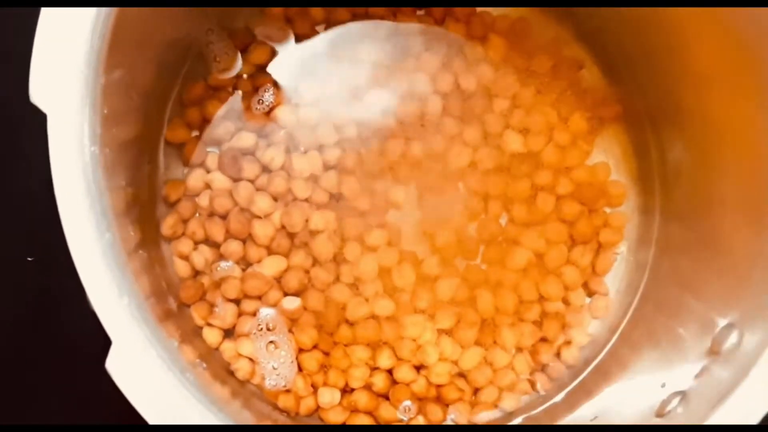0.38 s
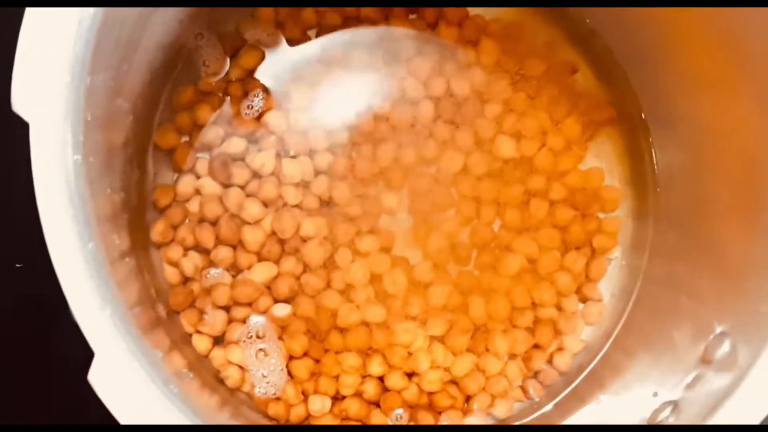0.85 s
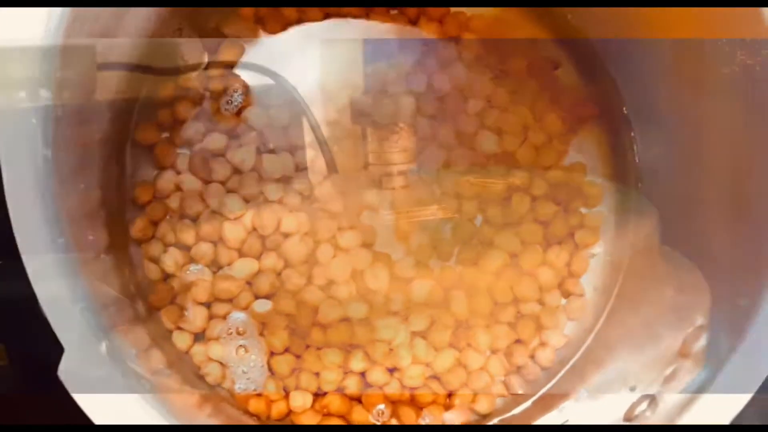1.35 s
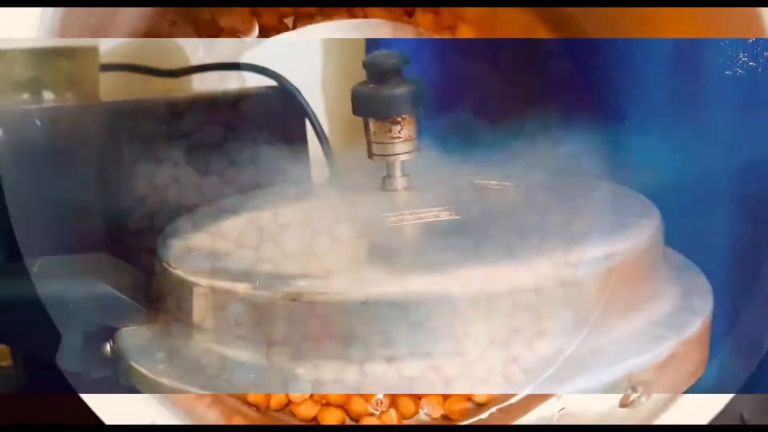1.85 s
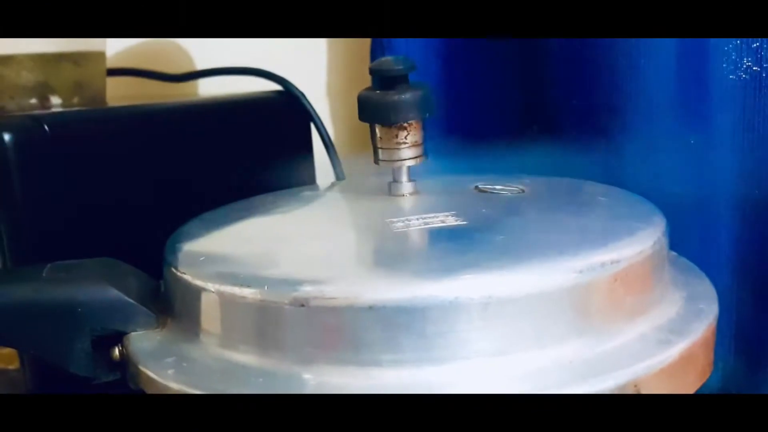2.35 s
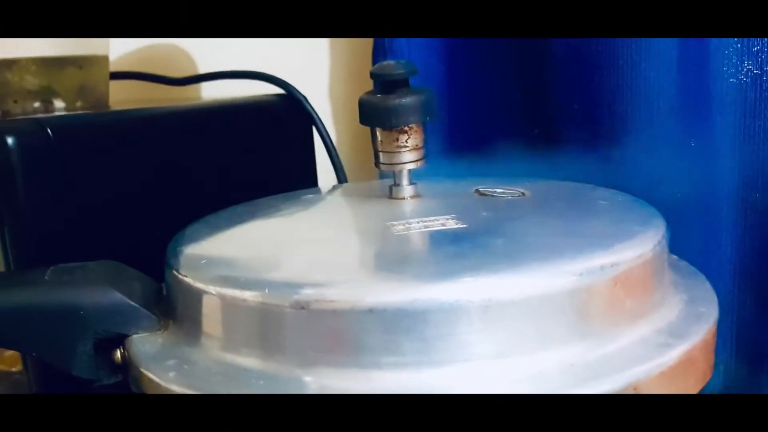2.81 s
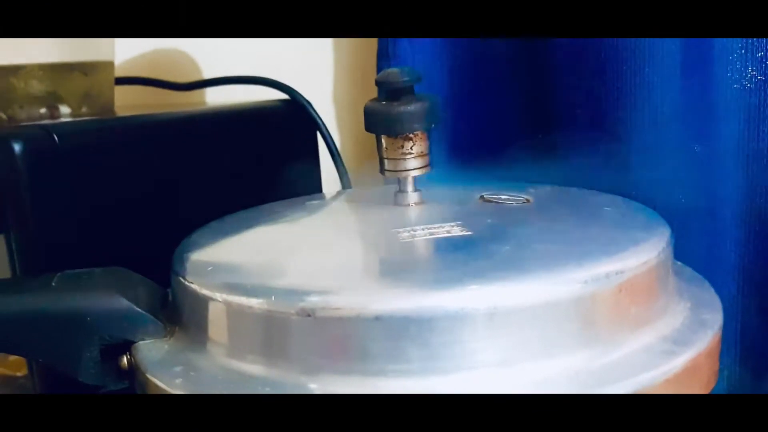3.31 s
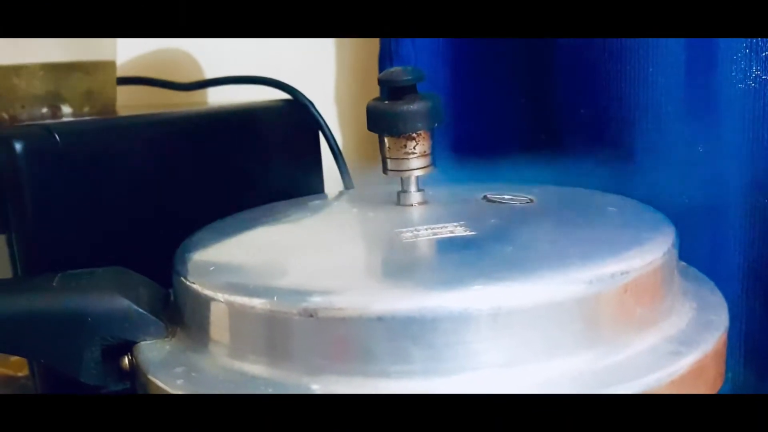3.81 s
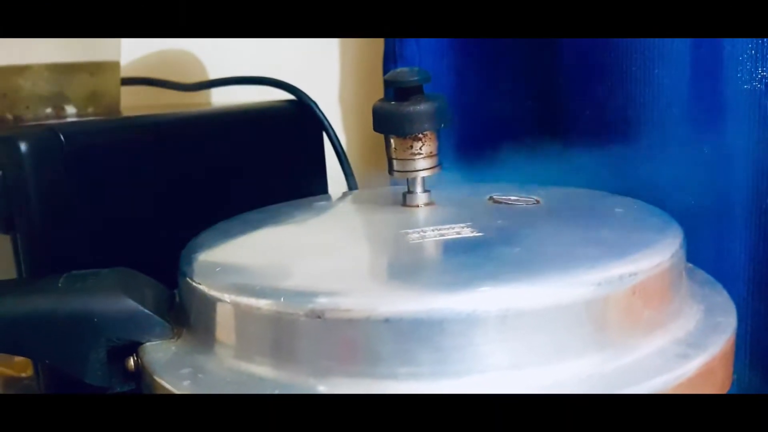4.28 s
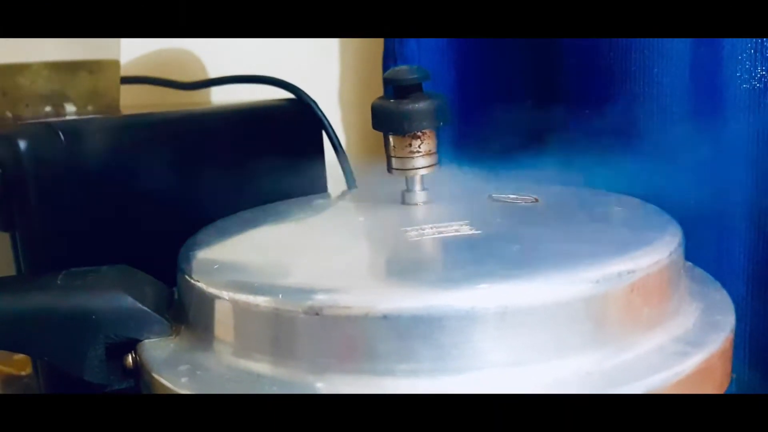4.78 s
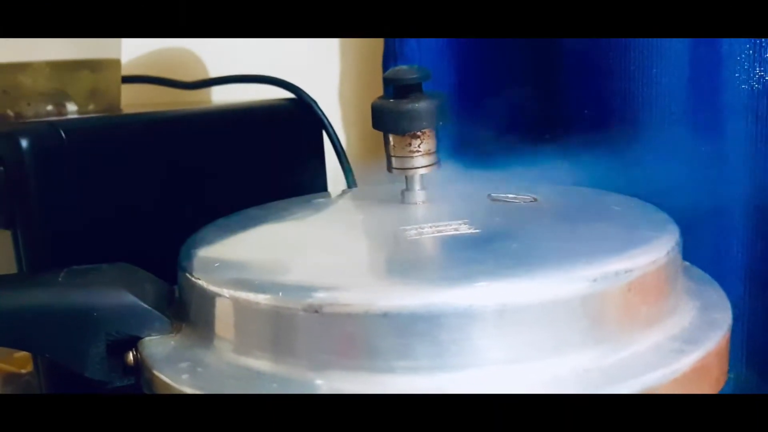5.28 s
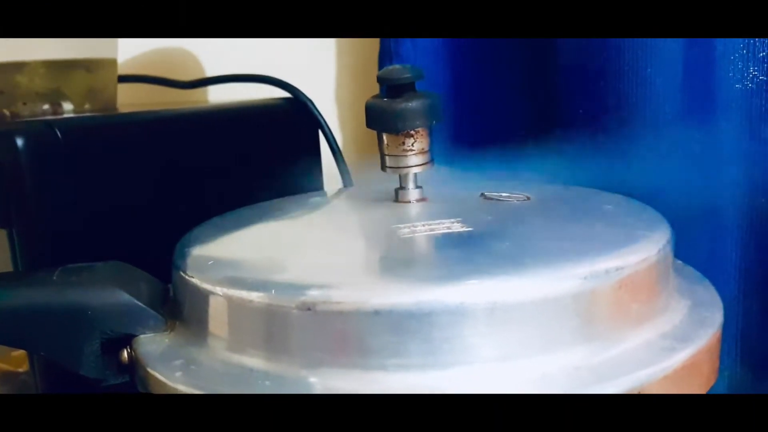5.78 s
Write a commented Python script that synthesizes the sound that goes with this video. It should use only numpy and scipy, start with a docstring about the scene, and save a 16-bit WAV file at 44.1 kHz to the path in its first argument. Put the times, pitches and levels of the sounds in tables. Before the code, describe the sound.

For about the first 1.4 seconds a kitchen is fairly quiet: soft room air, a faint steady fan hum and a slight airy swish at the start. Draught bumps the handheld microphone with soft low thumps, growing from about 0.3 seconds, with stronger ones near 0.5 and 0.9. At about 0.95 a short dull rattle of two quick knocks sounds and dies at once. From about 1.2 a thin steam leak rises, and near 1.46 the pressure cooker's valve lifts and a loud, bright hiss bursts out. It holds to the end at about 6.1 seconds, growing very slightly, broad and sharp with narrow metallic resonances. Steam drifting over the close stereo microphone adds dense, gritty crackle and lumpy low rumble, mostly left, surging around 2, 2.5 and 3.5, easing briefly near 3.3, and flaring irregularly afterwards; the right is much calmer.

```python
"""In a kitchen, a fan hums, its draught buffets a handheld microphone and something rattles once.
Then a pressure cooker fades in: steam leaks round the valve weight, lifts it and hisses out loudly.
Drifting steam buffets the two microphone ports, which crackle and rumble under the hiss.
Shaped noise makes the air, steam and low rumbles; random clicks make the crackle;
sines make the hum and the gusts' thumps; damped modes make the rattle."""
import sys
import numpy as np
from scipy import signal
from scipy.fft import irfft
from scipy.io import wavfile
from scipy.ndimage import uniform_filter1d

SR = 44100
rng = np.random.default_rng(int(sys.argv[2]) if len(sys.argv) > 2 else 0)


def voltage_ratio(decibels):
    """Convert decibels (scalar or array-like) to amplitude ratios, 20 dB per decade."""
    exponent = np.asarray(decibels, float) / 20
    return 10 ** exponent


def unload_wav(signal):
    """Save mono or channel-first audio to the path in sys.argv[1] as 16-bit WAV at rate SR, clipped to [-1, 1]."""
    wavfile.write(
        sys.argv[1],
        SR,
        np.round(np.clip(np.atleast_2d(signal).T, -1, 1) * 32767).astype(np.int16),
    )


N = 270333  # samples

# Colour of the quiet air. Each row: frequency in Hz, density in dB per Hz (relative).
ROOM_COLOUR = [(290, -25), (500, -3), (553, -11), (677, -9), (891, -9), (1040, -14), (1280, -13.5),
               (8370, -25.5), (14900, -21), (15800, -32)]
# Orders of the fan motor. Each row: order, sine level in dB before the hum's 2 dB lift.
FAN_ORDERS = [(6, -66), (8, -80), (9, -81), (10, -82), (11, -80), (13, -84), (21, -79), (22, -86),
              (24, -84)]
# Soft swishes in the treble. Each row: start in seconds, length in seconds, peak level in dB.
SWISHES = [(-0.03, .36, -62.5), (0.918, 0.086, -66)]
# Colour of the swishes. Each row: frequency in Hz, density in dB per Hz (relative).
SWISH_COLOUR = [(1470, -50), (2500, -26), (3790, -4), (4530, -5), (5080, 0), (6920, -7), (8460, -27),
                (11400, -5), (15800, -7)]
# Knocks of the short rattle. Each row: start in seconds, strength in dB (right port).
KNOCKS = [(0.945, -36.5), (0.963, -39), (0.981, -51), (0.996, -64), (1.019, -64)]
# Modes that each knock rings. Each row: frequency in Hz, level in dB (relative), 60 dB decay in seconds.
RATTLE_MODES = [(330, 0, .04), (677, -7, 0.055), (850, 0, 0.033), (1180, -9, 0.029), (1450, -17, .02),
                (1700, -15, .02), (2000, -17, .018), (2250, -22, .015)]
# Colour of the draught's rumble. Each row: frequency in Hz, density in dB per Hz (relative).
DRAUGHT_COLOUR = [(12, -2.5), (30, -3.5), (75, -4.5), (125, -13.5), (220, -19.5), (290, -27.5),
                  (370, -35.5), (650, -52), (900, -80), (1500, -120)]
# Gusts. Each row: start in seconds, thump peak in dB, thump pitch in Hz,
# puff of air in dB relative to that peak, swell of rumble in dB.
GUSTS = [(0.008, -55, 110, -20, -55), (0.166, -51, 121, -18, -47), (0.258, -43, 124, -17, -49),
         (0.318, -38, 204, -27, -38.5), (0.363, -44, 186, -27, -39), (0.474, -27, 122, -18, -37),
         (0.557, -41, 191, -21, -39), (0.591, -32.5, 162, -9.5, -38), (0.672, -36, 188, -13, -40),
         (0.7, -37, 123, -12.5, -44), (0.765, -46, 90, -22, -45), (0.845, -48, 167, -21, -41),
         (0.918, -25.5, 258, -12.5, -30), (1.006, -43, 144, -21, -34.5), (1.073, -34, 142, -26, -34),
         (1.181, -39.5, 192, -15, -47), (1.268, -35, 124, -12, -43), (1.349, -51, 121, -13, -43.5)]
# Colour of the puffs of air. Each row: frequency in Hz, gain in dB (relative).
PUFF_COLOUR = [(150, -20), (330, 9), (550, -10), (800, -28), (1200, -43), (3000, -95)]
# Drifting plume over the left port. Each row: time in seconds, strength of buffeting in dB.
PLUME = [(1.46, -8.5), (1.66, -6.5), (1.86, 0), (2.1, 1.5), (2.32, -0.5), (2.4, -4), (2.51, 2),
         (2.74, -2.5), (2.87, 0), (3.23, -1.5), (3.3, -13.5), (3.41, -6.5), (3.53, 2), (3.64, -4.5),
         (3.76, -5.5), (3.87, -1), (4.1, -8), (4.19, -3), (4.27, -6), (4.37, 0), (4.51, -10), (4.61, -1.5),
         (4.76, -0.5), (4.92, -7), (5.45, -4.5), (5.6, -9.5), (5.85, -1.5), (6.13, -15)]
# Stray wisps that reach the right port. Each row: centre in seconds, length in seconds, added buffeting in dB.
WISPS = [(1.548, 0.09, 2.5), (1.776, 0.09, 3.5), (1.97, .2, 4), (2.4, 0.23, 6.5), (2.717, 0.26, 9.5),
         (3.2, 0.14, 7), (3.504, .2, 4), (4.13, .25, 6.5), (4.52, 0.11, 5.5), (4.943, 0.17, 7),
         (5.28, 0.068, 1), (5.6, 0.086, 8.5), (6.027, 0.11, 7)]
# Colour of the steam's rumble. Each row: frequency in Hz, density in dB per Hz (relative).
RUMBLE_COLOUR = [(10, -32), (35, -11), (60, 5.5), (110, 3.5), (200, -9.5), (400, -58)]
# Colour of the clicks. Each row: frequency in Hz, gain in dB (relative).
CRACKLE_COLOUR = [(20, -15), (45, -4), (80, 1.5), (150, 2), (500, 2), (2000, 0), (4000, -4), (9000, -10),
                  (16000, -11)]
# Fuzzy tones that swell with the crackle. Each row: frequency in Hz, half-width in Hz,
# left and right level in dB relative to the crackle's base level.
FUZZY_TONES = [(1492, 50, -10.5, -13), (2042, 45, -11, -9)]
# Steam flow through the valve. Each row: time in seconds, hiss level in dB before the plume and a 1.22 dB lift.
STEAM_FLOW = [(1.0, -79), (1.044, -86), (1.164, -67), (1.354, -57.5), (1.416, -48), (1.454, -32),
              (1.504, -25), (1.6, -27), (1.74, -24), (2.0, -22), (4.2, -20.5), (6.13, -20)]
# Colour of the jet at the left port. Each row: frequency in Hz, density in dB per Hz (relative).
JET_LEFT = [(300, -18.5), (1200, -14.5), (2600, -11), (3250, -13.5), (3500, -9.5), (4200, -5.5), (5500, -4),
            (8600, -4.5), (10300, 0), (11500, 2), (12400, -0.5), (15000, 2), (15800, -2.5)]
# Colour of the jet at the right port. Each row: frequency in Hz, density in dB per Hz (relative).
JET_RIGHT = [(300, -27), (1200, -17.5), (2000, -10.5), (3250, -9.5), (3500, -11), (4200, -3), (5400, 3.5),
             (7000, -3), (8200, -8), (9100, -31), (10300, -6.5), (12000, -6), (14500, -3.5), (15800, -4)]
# Lid and valve resonances. Each row: frequency in Hz, width in Hz, left and right lift in dB.
RESONANCES = [(3490, 120, 11, 8.5), (3756, 31, 6, 13), (4180, 69, 11, 2), (4685, 36, -25, 7.5),
              (5453, 61, 11.5, 1.5), (6350, 105, 5, 8), (6990, 94, 6, 6.5), (11490, 240, 5, 0.5),
              (12200, 91, 5, 2), (12900, 180, 7, 1), (14300, 200, -1, 5.5), (15000, 250, 4.5, 6)]
# Likeness of the hiss at the two ports. Each row: frequency in Hz, likeness from 0 to 1.
LIKENESS = [(300, .15), (3000, .22), (4200, .4), (5600, .4), (6400, .2), (7200, .55), (8000, .55),
            (8600, .15), (13000, .15), (14000, .3), (16000, .25)]
# Phase by which the left port leads. Each row: frequency in Hz, lead in radians.
LEFT_LEAD = [(100, 0), (1500, 1.5), (3000, 2.7), (3600, 2.5), (4000, .5), (4500, 2.6), (5000, 3.3),
             (6300, 4.2), (7200, 6), (8300, 6.7), (9500, 5), (10500, 7), (12300, 6.5), (14000, 5.3),
             (15200, 8.5)]
# The leak before the weight lifts is flatter than the jet. Each row: frequency in Hz, dB on the jet's colour.
LEAK_COLOUR = [(800, 8), (2500, 6), (3800, 0), (5200, 0), (6100, 4.5), (7000, 0.5), (12000, -2)]
# The hiss slowly changes colour, gaining most around 4 kHz. Each row: frequency in Hz, change in dB per second.
COLOUR_DRIFT = [(2500, 0), (4000, 0.16), (6000, 0.07), (9000, 0), (15000, -0.07)]

LIFT_S = 1.458  # the weight lifts: crackle and rumble begin


def evened(x):
    """Scales a sound to rms 1, over both channels together."""
    return x / np.sqrt(np.mean(x ** 2) + 1e-20)


def read(points, hz):
    """Reads a frequency table, interpolating along a log frequency axis."""
    f, value = np.transpose(points)
    return np.interp(np.log(hz + 1), np.log(f + 1), value)


def add(mix, start_s, sound):
    """Lays a sound into the mix at a given time, cut off at the end."""
    part = mix[..., round(start_s * SR):][..., :sound.shape[-1]]
    part += sound[..., :part.shape[-1]]


def hiss(shape, same, size=512):
    """Two channels of random short-time spectra; shape(hz, t) is the gain, same(hz) the likeness."""
    frames = 4 * N // size + 5
    hz = np.fft.rfftfreq(size, 1 / SR)[:, None]
    a, b, c, d = rng.standard_normal((frames, len(hz), 4)).T
    alike = same(hz)
    left = a + 1j * b
    right = alike * left + np.sqrt(1 - abs(alike) ** 2) * (c + 1j * d)
    frame_s = np.arange(frames) * size / 4 / SR
    spectra = np.array([left, right]) * shape(hz, frame_s)
    return signal.istft(spectra, nperseg=size, noverlap=3 * size // 4)[1][:, :N]


def wander(shape, spans):
    """Smooth chance of rms 1, blurred over the given number of cells on each axis."""
    x = rng.standard_normal(shape)
    for axis, span in enumerate(spans):
        x = uniform_filter1d(x, span, axis)
    return evened(x)


def coloured(x, points):
    """Filters by a (Hz, dB) table with causal phase, so that clicks ring forwards only."""
    gain_db = read(points, abs(np.fft.fftfreq(8192, 1 / SR)))
    log_gain = np.log(voltage_ratio(gain_db))
    taps = np.fft.ifft(np.exp(np.conj(signal.hilbert(log_gain)))).real[:4096]
    return signal.oaconvolve(x, taps[None], axes=1)[:, :N]


def quiet_air():
    """Steady room air: coloured noise, largely alike at the two ports."""
    air = hiss(lambda hz, t: voltage_ratio(read(ROOM_COLOUR, hz)), lambda hz: 0 * hz + 0.76)
    return voltage_ratio(-73) * evened(air)


def fan_hum():
    """Sines at orders of the fan motor, whose shared phase wavers slightly."""
    fan_hz, waver_turns = 48.95, 0.011
    turns = fan_hz * np.arange(N) / SR + waver_turns * wander(N, (9000,))
    return sum(voltage_ratio(db + 2.0) * np.sin(2 * np.pi * (order * turns + rng.random()))
               for order, db in FAN_ORDERS)


def swishes():
    """Soft treble noise that swells and dies in half-sine arcs."""
    t = np.arange(N) / SR
    swell = np.zeros(N)
    for start_s, length_s, db in SWISHES:
        swell += voltage_ratio(db) * np.sin(np.pi * np.clip((t - start_s) / length_s, 0, 1))
    noise = hiss(lambda hz, t: voltage_ratio(read(SWISH_COLOUR, hz)), lambda hz: 0 * hz + 0.24)
    return swell * evened(noise)


def draught():
    """Lumpy low rumble, nearly the same at both ports, with gusts that thump; fades as the cooker comes in."""
    calm_db, fade_start_s, fade_db_per_s = -49.5, 1.44, 60
    swell_lag_s, swell_s = 0.015, 0.024
    t = np.arange(N) / SR
    air = evened(hiss(lambda hz, t: voltage_ratio(read(DRAUGHT_COLOUR, hz)), lambda hz: 0 * hz + 0.999, size=2048))
    swells = sum(voltage_ratio(db) * np.exp(-((t - s - swell_lag_s) / swell_s) ** 2) for s, *_, db in GUSTS)
    calm = voltage_ratio(calm_db - fade_db_per_s * np.clip(t - fade_start_s, 0, None))
    out = air * (swells + calm)
    puffs = np.zeros(N)
    puff_arc = np.sin(np.pi * np.linspace(0, 1, 926) ** 0.7) ** 2  # 21 ms
    for start_s, db, hz, puff_db, _ in GUSTS:
        turns = np.arange(round(2.5 * SR / hz)) * hz / SR  # two and a half cycles
        thump_arc = np.sin(np.pi * (turns / turns[-1]) ** 0.72) ** 2
        add(out, start_s, voltage_ratio(db) * np.sin(2 * np.pi * turns) * thump_arc)
        add(puffs, start_s, voltage_ratio(db + puff_db) * puff_arc)
    puff_noise = evened(coloured(rng.standard_normal((1, N)), PUFF_COLOUR))
    return out + puffs * puff_noise


def rattle():
    """Each knock is a short blow that rings a few damped modes, partly unlike at the two ports."""
    blow_s, echo_s = 0.001, 0.2  # 60 dB decays
    apart = 0.8  # depth of each port's own noise in the blow
    echo_db, echo_lag_s = -33, 0.0049  # echo level before the dulling below
    t = np.arange(round(0.15 * SR)) / SR
    body = sum(voltage_ratio(db - 60 * t / t60) * np.sin(2 * np.pi * hz * t) for hz, db, t60 in RATTLE_MODES)
    body *= 1 - np.exp(-(t / 0.0019) ** 2)  # a soft contact: no treble
    blows, echoes = np.zeros((2, N))
    blow = voltage_ratio(-60 * t / blow_s)
    for start_s, db in KNOCKS:
        add(blows, start_s, voltage_ratio(db) * blow / np.sum(blow))
        add(echoes, start_s + echo_lag_s, voltage_ratio(db + echo_db - 60 * t / echo_s))
    left, right, wall_left, wall_right = rng.standard_normal((N, 4)).T
    knocks = blows * (1 + apart * np.array([left, right]))
    # the room answers, duller; the gain makes up most of the level lost in smoothing
    answer = uniform_filter1d(echoes * np.array([wall_left, wall_right]), 10) * 2.5
    port_gain = voltage_ratio([[-2.5], [0]])  # left, right
    return signal.oaconvolve((knocks + answer) * port_gain, body[None], axes=1)[:, :N]


def wash():
    """How strongly drifting steam buffets each port, in dB: the plume on the left, single wisps on the right."""
    right_sag_db_per_s = -0.9  # between wisps the right port grows calmer
    t = np.arange(N) / SR
    plume = np.interp(t, *np.transpose(PLUME))
    wisps = sum(db * np.exp(-(2 * (t - s) / length_s) ** 2) for s, length_s, db in WISPS)
    return np.array([plume, wisps + right_sag_db_per_s * (t - LIFT_S)])


def rumble():
    """Slow lumps of pressure from the buffeting steam, almost unrelated at the two ports."""
    base_db, follows = np.array([[-36], [-51]]), np.array([[1.22], [1.7]])  # left, right; share of the wash
    sag_db_per_s = -1.13  # the base level sinks after the lift
    since_s = np.arange(N) / SR - LIFT_S
    lifted = np.clip(since_s / 0.03, 0, 1) * voltage_ratio(sag_db_per_s * since_s)
    lumps = voltage_ratio(5.7 * np.array([wander(N, (2500,)), wander(N, (2500,))]))
    noise = hiss(lambda hz, t: voltage_ratio(read(RUMBLE_COLOUR, hz)), lambda hz: 0 * hz + 0.05, size=2048)
    return evened(lumps * noise) * lifted * voltage_ratio(base_db + follows * wash())


def crackle():
    """Each port, on its own, lets out short clicks in clumps; most push one way, a few are large."""
    clicks_per_s, spread_db, clump_db = 2200, 3.5, 1.5
    base_db, follows = np.array([[-27.5], [-45]]), np.array([[1.054], [1.1]])  # left, right; share of the wash
    chance, size, sign = rng.random((N, 2, 3)).T
    clumps = np.array([wander(N, (500,)), wander(N, (500,))])
    clicks = (chance < clicks_per_s / SR) * np.where(sign < 0.8, 1, -1)
    largeness = np.minimum(-np.log(size + 1e-9), 4.0)
    clicks = clicks * voltage_ratio(spread_db * largeness + clump_db * clumps)
    out = voltage_ratio(5) * evened(coloured(clicks - clicks.mean(), CRACKLE_COLOUR))  # 5 dB above the base level
    for f, width, *db in FUZZY_TONES:
        tone = hiss(lambda hz, t: np.exp(-((hz - f) / width) ** 2), lambda hz: 0 * hz + 0.19, size=2048)
        out = out + voltage_ratio(db)[:, None] * evened(tone)
    lifted = np.clip((np.arange(N) / SR - LIFT_S) / 0.011, 0, 1)
    return voltage_ratio(base_db + follows * wash()) * lifted * out


def jet():
    """Turbulent hiss through lid resonances; a small leak comes first, until the weight lifts."""
    patchy_db, flicker_db, ripple_db = 1.0, 0.69, 1.27  # rms
    open_db = -41  # flow at which the weight has lifted
    plume_share = (0.19, 0.091)  # of the wash in dB: left, right
    flow_s, flow_db = np.transpose(STEAM_FLOW)

    def colour(hz, t):
        """Gain of the steam at each port, frequency and time."""
        db = np.array([read(JET_LEFT, hz), read(JET_RIGHT, hz)])
        for f, width, *lift_db in RESONANCES:
            db = db + np.reshape(lift_db, (2, 1, 1)) / (1 + (2 * (hz - f) / width) ** 2)
        shut = np.clip((open_db - np.interp(t, flow_s, flow_db)) / 12, 0, 1)
        ripple = wander((len(hz), 2), (2,)).T[..., None]  # a fixed, random fine ripple in each port's colour
        db = db + read(COLOUR_DRIFT, hz) * (t - 3.5) + shut * read(LEAK_COLOUR, hz) + ripple_db * ripple
        patches = wander((len(t), len(hz)), (30, 12)).T
        return voltage_ratio(db + patchy_db * patches + flicker_db * wander(len(t), (12,)))

    def likeness(hz):
        """Complex likeness of the ports: how alike, and how far the left leads."""
        return np.clip(read(LIKENESS, hz), 0, 0.99) * np.exp(-1j * read(LEFT_LEAD, hz))

    steam = hiss(colour, likeness, size=1024)
    t = np.arange(N) / SR
    plume_db = uniform_filter1d(plume_share * wash().T * (t > LIFT_S)[:, None], 2000, axis=0).T
    level_db = np.interp(t, flow_s, flow_db, left=-120) + plume_db + 1.22
    return voltage_ratio(level_db) * steam / steam.mean(0).std()


def scene():
    """The fan and its draught, the rattle and the pressure cooker, summed at the two ports."""
    background = quiet_air() + fan_hum() + swishes() + draught() + rattle()
    cooker = rumble() + crackle() + jet()
    return background + cooker


def roll_off(x):
    """The treble ends steeply here."""
    return signal.sosfilt(signal.butter(12, 16970, fs=SR, output="sos"), x)


def record(dry):
    """Peaks are squeezed; the right port has a narrow dip; the band ends sharply."""
    full_scale, edge_hz = 0.95, 15770
    dip_hz, dip_width_hz, dip_db = 8620, 600, -30  # before the window softens it
    hz = np.fft.rfftfreq(2048, 1 / SR)
    right_db = dip_db * np.exp(-(2 * (hz - dip_hz) / dip_width_hz) ** 4)
    ports = voltage_ratio([0 * hz, right_db]) * (hz < edge_hz)
    taps = np.fft.fftshift(irfft(ports), axes=1) * np.blackman(2048)
    squeezed = full_scale * np.tanh(dry / full_scale)  # the input stage rounds off the peaks
    mix = signal.oaconvolve(squeezed, taps, "same", axes=1)
    return roll_off(mix)


dry = scene()
out = record(dry)
unload_wav(out)
```